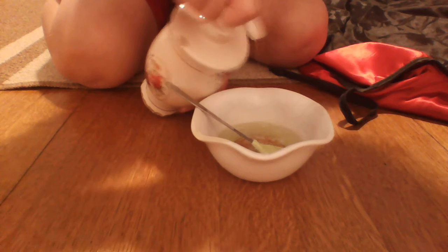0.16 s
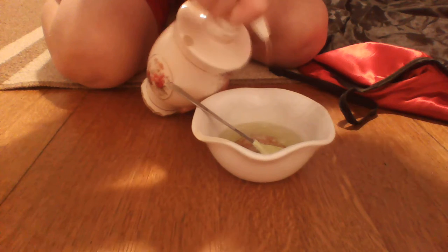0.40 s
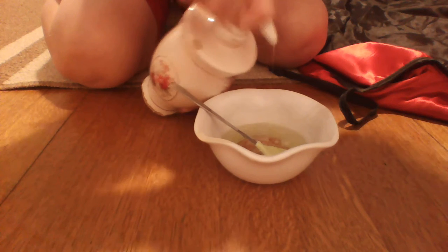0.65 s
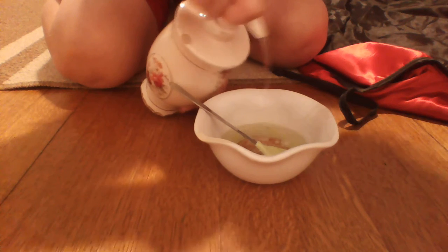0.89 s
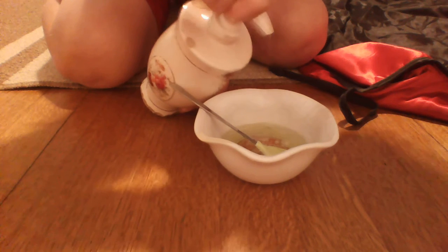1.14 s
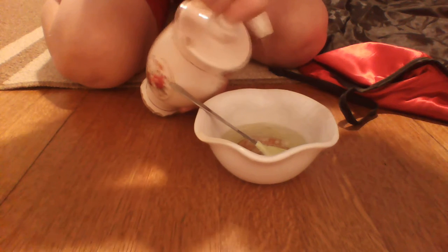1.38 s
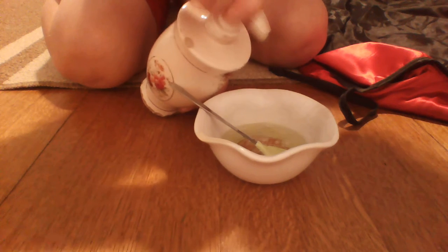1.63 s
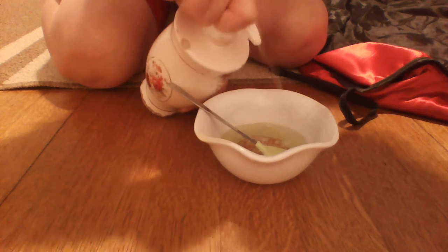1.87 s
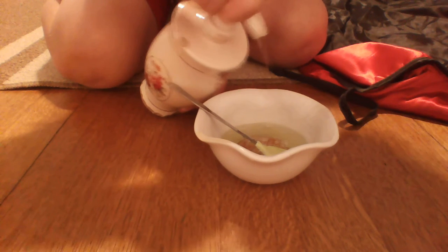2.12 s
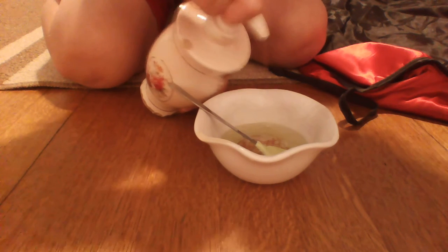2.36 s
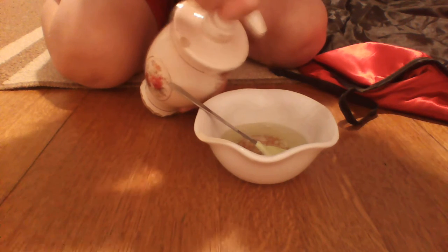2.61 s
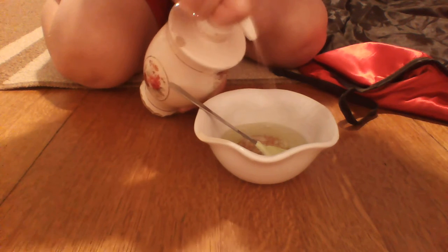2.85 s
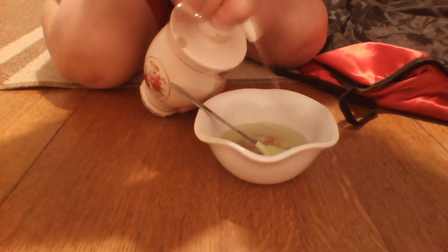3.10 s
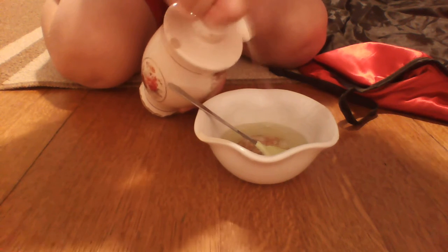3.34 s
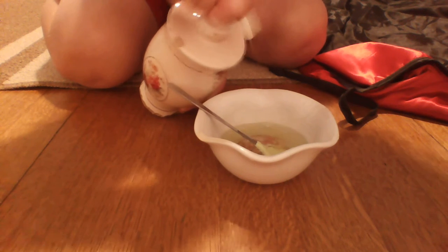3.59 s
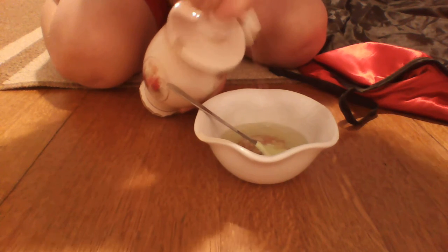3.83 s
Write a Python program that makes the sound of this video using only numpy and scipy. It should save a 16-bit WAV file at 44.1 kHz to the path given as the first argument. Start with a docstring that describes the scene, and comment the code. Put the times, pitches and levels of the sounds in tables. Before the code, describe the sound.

A ceramic jar knocks and clinks on a wooden floor, then its pump is worked in quick thudding, clicking strokes that gradually speed up.

```python
"""A low rumble, microphone hiss, a thin whine and a faint high trill run throughout: shaped noise and sines.
A ceramic soap dispenser, tilted on a wooden floor close by, is rocked three times, then pumped quickly.
Strokes thud into the boards as struck modes; the plastic valve ticks as short noise cracks.
The jar's foot knocks on the floor, and the loose collar clinks on the glazed jar, chattering on its modes.
A small room answers with fading noise."""
import sys
import numpy as np
from scipy import signal
from scipy.fft import rfft, irfft, next_fast_len
from scipy.io import wavfile
from scipy.ndimage import map_coordinates

SR = 44100
rng = np.random.default_rng(int(sys.argv[2]) if len(sys.argv) > 2 else 0)


def dump_mix(stems):
    """Bounce the given channels to the path in sys.argv[1] as a 16-bit WAV at rate SR."""
    frames = np.atleast_2d(stems).T  # one column per channel
    limited = np.clip(frames, -1, 1)  # hard clip at full scale
    pcm = np.round(limited * 32767).astype(np.int16)
    wavfile.write(sys.argv[1], SR, pcm)


def voltage_ratio(decibels):
    """Convert decibels (scalar or array-like) to amplitude ratios, 20 dB per decade."""
    exponent = np.asarray(decibels, float) / 20
    return 10 ** exponent


N = 177855


def unit(x):
    """Scaled to rms 1."""
    return x / np.sqrt(np.mean(x ** 2) + 1e-20)


def along(points, hz):
    """Interpolates (hz, value) points on a log frequency axis."""
    point_hz, value = np.transpose(points)
    return np.interp(np.log(hz + 1), np.log(point_hz + 1), value)


def filtered(x, response):
    """x times a response of frequency."""
    size = next_fast_len(x.shape[-1] + 8192)
    spectrum = rfft(x, size) * response(np.fft.rfftfreq(size, 1 / SR))
    return irfft(spectrum, size)[..., :x.shape[-1]]


def ring(hz, t60_s, length_s, contact_s):
    """Struck modes, one row each: decaying sines whose onset rises with time constant contact_s."""
    t = np.arange(round(length_s * SR)) / SR
    decay = voltage_ratio(-60 * t / np.reshape(t60_s, (-1, 1)))
    onset = 1 - np.exp(-t / contact_s)
    return np.sin(2 * np.pi * np.outer(hz, t)) * decay * onset


def add(track, start_s, sound):
    """Mixes a sound in at start_s."""
    part = track[..., round(start_s * SR):][..., :sound.shape[-1]]
    part += sound[..., :part.shape[-1]]


def mid_side_gains(likeness):
    """Mid and side gains that give two channels of noise this correlation."""
    turn = np.arccos(np.clip(likeness, -1, 1)) / 2
    return np.cos(turn), np.sin(turn)


# left-right likeness of background noise: [pitch_hz, correlation]
NOISE_LIKENESS = [(60, .9), (300, 1), (1000, -0.12), (6000, -0.063), (10300, -0.16), (10900, -0.76),
                  (12400, -0.24), (13000, 0)]


def stereo_noise(spectrum):
    """Shaped noise of rms 1 with a likeness between channels that depends on frequency."""
    def gain(hz):
        return voltage_ratio(along(spectrum, hz)) * np.array(mid_side_gains(along(NOISE_LIKENESS, hz)))
    mid, side = filtered(rng.standard_normal((2, N)), gain)
    return unit(np.array([mid + side, mid - side]))


# rumble spectrum before scaling: [pitch_hz, level_db per Hz]
RUMBLE_SPECTRUM = [(11, -29), (18, 5), (86, 3.5), (103, -11.5), (124, -33), (130, -16.5), (170, -38.5),
                   (290, -120)]
# weight shifts on the boards: [peak_s, level_db, sway_hz]
BUMPS = [(.11, -37.5, 75), (0.981, -38.5, 78.5), (1.131, -42, 56.2)]
RUMBLE_DB, RUMBLE_WAVER_DB, RUMBLE_WAVERS_PER_S = -55, 1.5, 7.1
BUMP_RISE_DB_PER_S, BUMP_FALL_DB_PER_S = 350.5, 110.5
SWAY_OVER_BUMP_DB, SWAY_SAG_PER_S = 0.5, .8  # sag: share of pitch lost a second


def rumble():
    """Low noise that wavers at random; when weight shifts on the boards it swells and the floor sways."""
    t = np.arange(N) / SR
    waver = map_coordinates(rng.standard_normal(200), [t * RUMBLE_WAVERS_PER_S])
    swell, sway = voltage_ratio(RUMBLE_DB + RUMBLE_WAVER_DB * waver), 0
    for peak_s, level_db, sway_hz in BUMPS:
        since_s = t - peak_s
        bump = voltage_ratio(level_db - np.maximum(-BUMP_RISE_DB_PER_S * since_s, BUMP_FALL_DB_PER_S * since_s))
        swell = swell + bump
        cycles = sway_hz * since_s * (1 - SWAY_SAG_PER_S * since_s / 2)
        sway = sway + bump * np.sin(2 * np.pi * cycles)
    return swell * stereo_noise(RUMBLE_SPECTRUM) + voltage_ratio(SWAY_OVER_BUMP_DB) * sway


# hiss spectrum before scaling: [pitch_hz, level_db per Hz]
HISS_SPECTRUM = [(60, -33), (100, 8.5), (300, 2.5), (680, -3), (1000, -9.5), (2000, -10), (3500, -12.5),
                 (6500, -14), (9000, -12), (11000, -7), (12500, -3.5), (14000, -12), (15700, -9),
                 (16300, -39)]
HISS_DB = -52.5


def hiss():
    """Steady microphone noise."""
    return voltage_ratio(HISS_DB) * stereo_noise(HISS_SPECTRUM)


# trill tones: [pitch_hz, level_db at the crest of a swell]
TRILL = [(12613, -62), (12850, -62), (13090, -67)]
TRILL_SWELLS_HZ, TRILL_CREST_S = 7.5, .129


def trill():
    """Close high sines under one periodic swell."""
    t = np.arange(N) / SR
    swell = np.exp(3.5 * (np.cos(2 * np.pi * TRILL_SWELLS_HZ * (t - TRILL_CREST_S)) - 1))
    return sum(voltage_ratio(level_db) * np.sin(2 * np.pi * pitch_hz * t) for pitch_hz, level_db in TRILL) * swell


WHINE_HZ, WHINE_DB = 8000, -74


def whine():
    """A thin sine whose phase wanders at random."""
    t = np.arange(N) / SR
    wander_rad = np.cumsum(rng.normal(0, .02, N))
    return voltage_ratio(WHINE_DB) * np.sin(2 * np.pi * WHINE_HZ * t + wander_rad)


# pump strokes and rebounds: [start_s, thud_db, kind (0 down, 1 up, 2 slow down), click_db]
STROKES = [(0.0585, -22.5, 0, -32), (0.5586, -28, 1, -51.5), (0.8066, -32.5, 2, -48), (0.9, -28, 1, -34.5),
           (1.0395, -21.5, 0, -34), (1.1157, -30.5, 0, -48), (1.2795, -31, 0, -57), (1.3601, -28, 1, -34.5),
           (1.476, -21, 0, -35.5), (1.5525, -30.5, 0, -43), (1.6988, -24.5, 2, -38.5),
           (1.7561, -25, 1, -30.5), (1.877, -20, 0, -37), (1.9467, -32.5, 0, -59), (2.0751, -26, 2, -43.5),
           (2.155, -32, 1, -46), (2.24, -20.5, 0, -35.5), (2.3017, -32.5, 0, -61.5), (2.387, -26, 1, -35),
           (2.4407, -26.5, 1, -30.5), (2.5189, -20.2, 0, -32.5), (2.5693, -27, 0, -52.5),
           (2.6693, -28.5, 2, -41.5), (2.808, -20.5, 0, -34.5), (2.8624, -33.5, 0, -45),
           (2.9512, -23, 2, -38), (3.0019, -24, 1, -32.5), (3.0817, -20, 0, -31.5), (3.1258, -35, 1, -48.5),
           (3.2094, -25.5, 2, -40), (3.3174, -23.5, 0, -35.5), (3.3999, -22, 2, -42),
           (3.4282, -25, 1, -29.5), (3.5268, -21, 0, -31.5), (3.5784, -33, 0, -51), (3.6631, -24, 2, -41),
           (3.7707, -22.5, 0, -32), (3.8186, -32, 0, -55), (3.8791, -27, 2, -44.5), (3.9495, -33, 1, -46),
           (4.007, -23, 0, -34)]
# floor board modes under the jar: [pitch_hz, t60_s, down_strength (signed), up_strength (signed)]
BOARDS = [(69, .3, .004, -.045), (94.5, .25, -.073, .119), (157.7, .035, -.104, .031),
          (164.9, .3, .085, -.06), (197.5, .156, -.733, .405), (199.8, .075, 1, -.536),
          (240.6, .24, -.28, .225), (250.9, .162, -.109, .142), (276.3, .2, .08, -.075),
          (292.3, .152, -.061, .06), (386.9, .049, -.039, .073), (476.4, .03, -.206, -.072),
          (502.7, .058, .162, -.426), (542.7, .026, .149, .041), (685.3, .009, -.165, .209),
          (938.8, .023, -.017, -.075)]
# plunger stop modes: [pitch_hz, t60_s, down_db, up_db, slow_down_db]
STOPS = [(833, 0.0072, -2.5, -12.5, -5), (1385, 0.0078, -0.5, -6, 1.5), (2256, 0.0093, -3, 0.5, 6),
         (3005, 0.0052, -2.5, 5, 3.5)]
SLOW_LEAD_S, SEAT_DELAY_S = .0022, .00027


def pump():
    """A stroke's end pushes the boards down or lets them up: same modes, other signs; the plunger clicks."""
    thuds, clicks = np.zeros((2, N))
    hz, t60_s, down, up = np.transpose(BOARDS)
    boards = ring(hz, t60_s, .4, .0004)
    stop_hz, stop_t60_s, *stop_db = np.transpose(STOPS)
    chance = rng.standard_normal((len(STROKES), 2, len(STOPS)))
    for (start_s, thud_db, kind, click_db), (detune, loudness) in zip(STROKES, chance):
        kind = round(kind)
        lead_s = SLOW_LEAD_S * (kind == 2)  # a slow push loads the boards before the plunger seats
        strength = up if kind == 1 else down
        add(thuds, start_s - lead_s, voltage_ratio(thud_db) * strength @ boards)
        stops = ring(stop_hz * (1 + .05 * detune), stop_t60_s, .02, .0005)  # never seats alike
        stop_gain = voltage_ratio(click_db + stop_db[kind] + 1.5 * loudness) * [1, -1, 1, -1]
        add(clicks, start_s + SEAT_DELAY_S, stop_gain @ stops)
    return thuds, clicks


# valve ticks: [start_s, crack_db]
TICKS = [(.0595, -36), (.2763, -35), (.5344, -39), (.7746, -37), (1.2516, -35), (1.3593, -38),
         (1.6756, -32), (1.7928, -34), (1.8672, -39), (2.0507, -31), (2.2323, -37.5), (2.366, -29),
         (2.6459, -31.5), (2.9322, -30), (3.1852, -31), (3.3887, -28.5), (3.4271, -35), (3.5199, -38.5),
         (3.6336, -33.5), (3.6914, -34), (3.8586, -27.5), (3.921, -38.5)]
# jar ring under a tick's crack, one per mode group: [level_db]
VALVE_RING_DB = [-26.5, -9, -34, -48, -22, -11.5]


def valve_ticks():
    """Blows of the plastic valve: each excites the jar's mode groups in fixed proportion to its crack."""
    return [(start_s, crack_db, crack_db + np.array(VALVE_RING_DB)) for start_s, crack_db in TICKS]


# glazed jar modes: [pitch_hz, level_db, t60_s]
JAR = [(1985, 0, .05), (2003, -17, .3), (2400, -9, .012), (2750, -11, .012), (3300, -4, .025),
       (3780, -2, .04), (4620, -4, .03), (4680, -2, .035), (5770, 0, .03), (6265, -3, .035),
       (8000, -9, .02)]
# group of each jar mode: [group_index]
MODE_GROUP = [0, 0, 1, 1, 2, 2, 3, 3, 4, 4, 5]
# crack spectrum: [pitch_hz, level_db per Hz]
CRACK_SPECTRUM = [(880, -36.5), (1500, -7), (2880, -1), (4920, -9.5), (12000, 2.5), (14100, -2.5),
                  (16000, -18.5)]
# collar settling, spectrum before scaling: [pitch_hz, level_db per Hz]
SCRAPE_SPECTRUM = [(250, -4.5), (420, 5), (650, 6), (900, -10.5), (1500, -11.5), (2200, -9.5),
                   (3500, -39.5)]
MODE_SCATTER_DB = 3.5  # no two blows ring alike
SETTLE_DB, SETTLE_TOP_DB, SETTLE_T60_S = -7.5, -39.5, .19  # under the first group's level; ceiling; fade
CRACK_T60_S, CRACK_RISE_S, CHATTER_T60_S, SETTLE_RISE_S = .012, .00093, .0078, .0018


def strike_jar(blows):
    """Each blow cracks, differently at each port; the collar chatters on the jar's modes, then settles."""
    cracks, jar, settle = np.zeros((2, N)), np.zeros((2, N)), np.zeros(N)
    hz, mode_db, t60_s = np.transpose(JAR)
    modes = ring(hz, t60_s, 0.45, 0.00017)
    t, settle_t = np.arange(SR // 50) / SR, np.arange(SR // 5) / SR
    crack_shape = voltage_ratio(-60 * t / CRACK_T60_S) * (1 - np.exp(-t / CRACK_RISE_S))
    settle_shape = voltage_ratio(-60 * settle_t / SETTLE_T60_S) * (1 - np.exp(-settle_t / SETTLE_RISE_S))
    chance = rng.standard_normal((len(blows), 3, 1 + len(JAR), len(t)))
    for (start_s, crack_db, group_db), (shared, *own) in zip(blows, chance):
        own = np.array(own)  # one per port
        add(cracks, start_s, voltage_ratio(crack_db) * crack_shape * (shared[0] + 0.74 * own[:, 0]))
        chatter = (shared[1:] + 0.52 * own[:, 1:]) * voltage_ratio(-60 * t / CHATTER_T60_S)
        rung = signal.fftconvolve(modes[None], chatter, axes=2)
        rung /= abs(rung).max(axis=(0, 2), keepdims=True)
        gain = voltage_ratio(group_db[MODE_GROUP] + mode_db + MODE_SCATTER_DB * shared[1:, -1])
        add(jar, start_s, gain @ rung)
        add(settle, start_s, voltage_ratio(min(group_db[0] + SETTLE_DB, SETTLE_TOP_DB)) * settle_shape)
    grain = voltage_ratio(3.7 * rng.standard_normal(N // 64 + 1)).repeat(64)[:N]  # level steps every 64 samples
    grit = unit(grain * rng.standard_normal(N))
    scrape = settle * unit(filtered(grit, lambda f: voltage_ratio(along(SCRAPE_SPECTRUM, f))))
    return filtered(cracks, lambda f: voltage_ratio(along(CRACK_SPECTRUM, f))), jar, scrape


# room decay: [pitch_hz, t60_s]
ROOM = [(150, 0.72), (600, 0.46), (2000, 0.21), (6000, 0.34), (14000, 0.018)]
# left-right likeness of the room's answer: [pitch_hz, correlation]
ROOM_LIKENESS = [(200, .9), (800, 0.81), (2500, 0.46), (8000, 0)]
ROOM_DELAY_S = .0036


def room(x, block_s=0.29):
    """Noise tails whose decay depends on frequency; every block of sound finds new reflections."""
    out, size = np.zeros((2, N)), round(block_s * SR)
    for start in range(0, N, size):
        hz, t, noise = signal.stft(rng.standard_normal((2, SR // 2)), SR, nperseg=256)
        mid_gain, side_gain = mid_side_gains(along(ROOM_LIKENESS, hz)[:, None])
        mid, side = noise[0] * mid_gain, noise[1] * side_gain
        fading = np.array([mid + side, mid - side]) * voltage_ratio(-60 * t / along(ROOM, hz)[:, None])
        tail = signal.istft(fading, SR, nperseg=256)[1]
        tail = tail / np.linalg.norm(tail[0])
        answer = signal.fftconvolve(x[None, start:start + size], tail, axes=1)
        add(out, start / SR + ROOM_DELAY_S, answer)
    return out


# drops of the jar's foot on the floor: [start_s, knock_db, boom_db]
KNOCKS = [(0.0826, -3.5, -22.5), (0.3782, -9.5, -21.5), (0.5528, -22, -26)]
# modes of the foot and the wood under it: [pitch_hz, t60_s, strength (signed)]
FOOT = [(212, .15, .06), (230, .15, -.12), (310, .1, .07), (356, .027, -.15), (412, .07, .17),
        (522, .2, -.03), (562, .025, .32), (612, .3, .035), (635, .039, -.25), (713, .01, 1),
        (826, .055, .18), (963, .022, -.49), (1028, .2, .025), (1357, .15, .025), (1195, .018, .51),
        (1296, .088, .06), (1586, .017, -.92), (1746, .096, -.03)]


def knocks():
    """A drop rings foot and wood in the same way each time, and booms in the boards."""
    out = np.zeros(N)
    hz, t60_s, strength = np.transpose(FOOT)
    blow = strength @ ring(hz, t60_s, .3, .0004)
    hz, t60_s, down, _ = np.transpose(BOARDS)
    boom = down @ ring(hz, t60_s, .4, .0004)
    for start_s, knock_db, boom_db in KNOCKS:
        add(out, start_s, voltage_ratio(knock_db) * blow)
        add(out, start_s, voltage_ratio(boom_db) * boom)
    return out


# collar clinks on the jar: [start_s, crack_db, ring_db, place (0 low on the body, 1 at the rim)]
CLINKS = [(.0827, -19, -15.5, .01), (.0904, -15.5, -23, .4), (.0957, -17, -20.5, 0.32),
          (.1054, -37.5, -27.5, 0.11), (0.2665, -54, -52.5, 1), (.2957, -36, -45.5, 1.16),
          (0.336, -44, -51.5, 1.07), (0.3789, -25.5, -21, 0.045), (.3844, -23.5, -47, 0.63),
          (0.3885, -29.5, -21, 0.059), (0.3924, -34, -32.5, 0.74), (.4154, -51, -36.5, .01),
          (0.5041, -46, -46, 0.28), (.5414, -39, -44, 0.0087), (.5531, -36.5, -38.5, .01),
          (0.5573, -41, -38, 0.9), (0.6328, -47, -40.5, .01), (0.6557, -53, -47, .8),
          (1.7158, -34, -43, 1.01), (2.4395, -39.5, -51.5, 0.33), (2.5746, -18, -32, 1.12),
          (2.6354, -45, -58, 0.0092), (2.7753, -32, -41.5, 1.02), (2.8663, -31.5, -42, 0.88),
          (3.0533, -24, -35.5, 1.175), (3.2234, -48, -42, 0.16), (3.6971, -21, -32, 1.12),
          (3.931, -37, -33.5, 0.88)]
# mode group balance when struck low on the body: [level_db]
STRUCK_LOW_DB = [-0.5, -10, -17, -8.5, -25, -7]
# mode group balance when struck at the rim: [level_db]
STRUCK_RIM_DB = [0, 2, -2.5, -2, 1, 3.5]


def collar_clinks():
    """Blows of the loose collar: the place struck sets the balance of the jar's mode groups."""
    low_db, rim_db = np.array([STRUCK_LOW_DB, STRUCK_RIM_DB])
    return [(start_s, crack_db, ring_db + low_db + place * (rim_db - low_db))
            for start_s, crack_db, ring_db, place in CLINKS]


# left over the middle, right under it by as much: [pitch_hz, level_db]
PORT_BALANCE = [(300, .4), (1500, .8), (2000, 2.2), (3000, .5), (4700, -1.6), (12000, -.8)]
# left behind the middle, right ahead by as much: [pitch_hz, phase_rad]
PORT_LAG = [(100, .04), (250, .13), (500, .05), (1000, 0)]


def at_ports(x):
    """The jar stands a little off the middle: level and phase differ between the two ports."""
    def response(hz):
        balance_db = np.outer([1, -1], along(PORT_BALANCE, hz))
        lag_rad = np.outer([1, -1], along(PORT_LAG, hz))
        return voltage_ratio(balance_db) * np.exp(-1j * lag_rad)
    return filtered(x, response)


# sent into the room
THUD_WET_DB, CLICK_WET_DB, JAR_WET_DB, DROP_WET_DB, CRACK_WET_DB = -20, -9.5, -12.5, -15, -5


def scene():
    """Direct sound, room and background; thuds send the smallest share into the room, cracks the largest."""
    background = rumble() + hiss() + trill() + whine()
    thuds, clicks = pump()
    cracks, jar, scrape = strike_jar(collar_clinks() + valve_ticks())
    drops = knocks()
    near = at_ports(thuds + clicks + drops + scrape + jar) + cracks
    sent = voltage_ratio(THUD_WET_DB) * thuds + voltage_ratio(CLICK_WET_DB) * clicks + voltage_ratio(DROP_WET_DB) * drops
    sent = sent + voltage_ratio(JAR_WET_DB) * jar[0] + voltage_ratio(CRACK_WET_DB) * cracks[0]
    return near + room(sent) + background


def band_limit(x):
    """A steep low-pass at the top of the band."""
    return signal.sosfilt(signal.butter(12, 16820, fs=SR, output="sos"), x)


def record(dry):
    """Soft limiting of the loudest peaks, then a low-pass."""
    full_scale, top_hz = .93, 16500
    limited = dry / (1 + abs(dry / full_scale) ** 8) ** (1 / 8)
    mix = filtered(limited, lambda hz: hz < top_hz)
    return band_limit(mix)


dry = scene()
out = record(dry)
dump_mix(out)
```